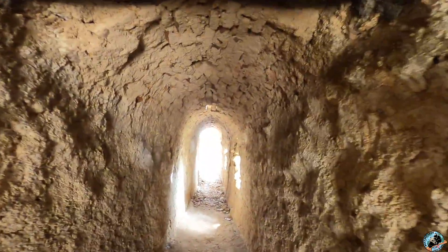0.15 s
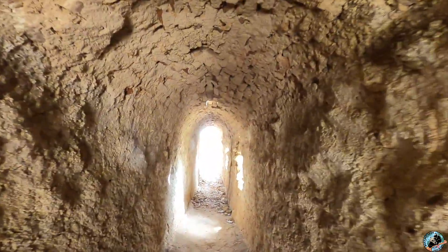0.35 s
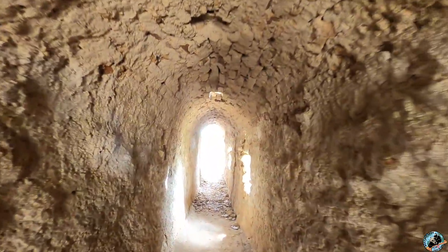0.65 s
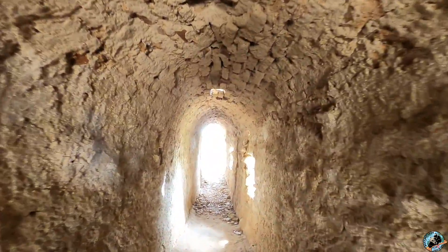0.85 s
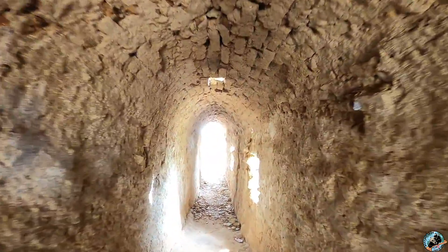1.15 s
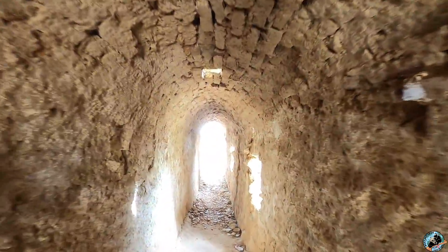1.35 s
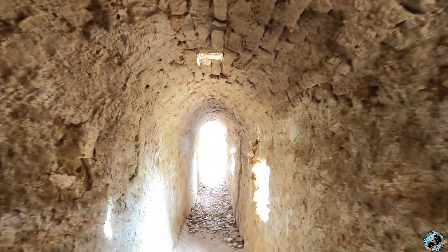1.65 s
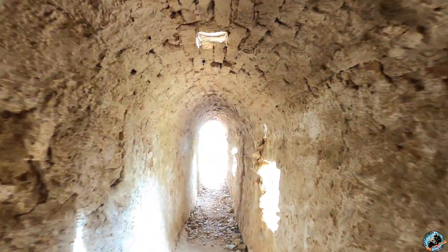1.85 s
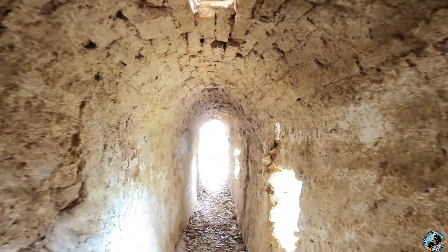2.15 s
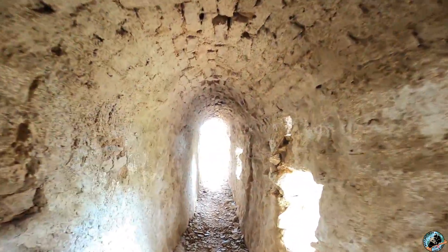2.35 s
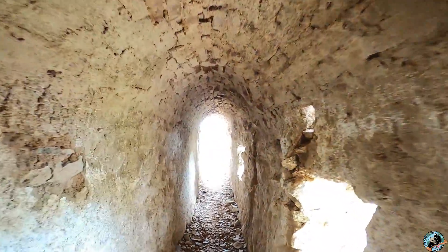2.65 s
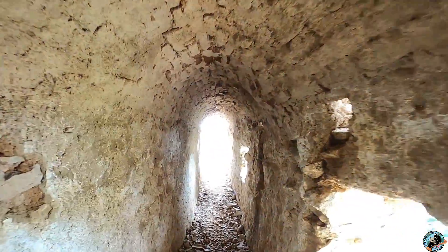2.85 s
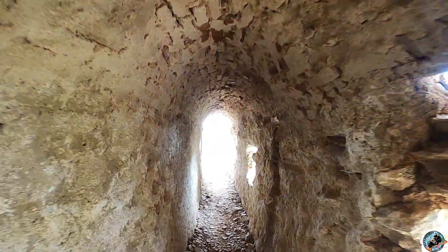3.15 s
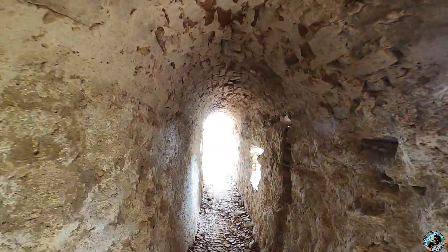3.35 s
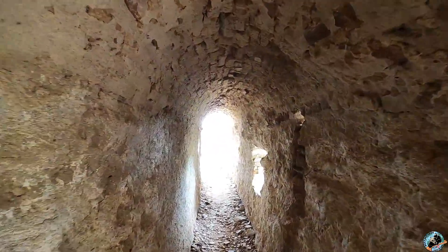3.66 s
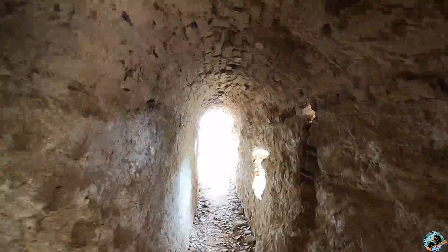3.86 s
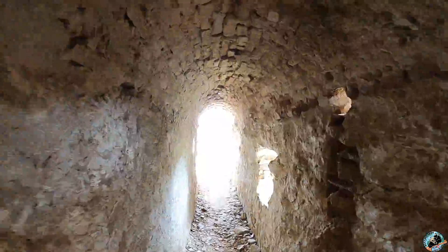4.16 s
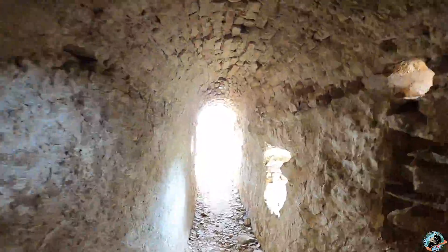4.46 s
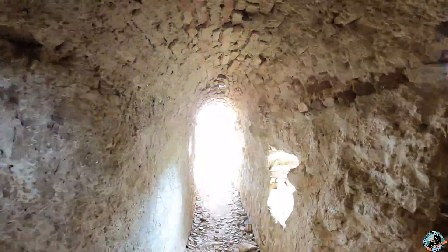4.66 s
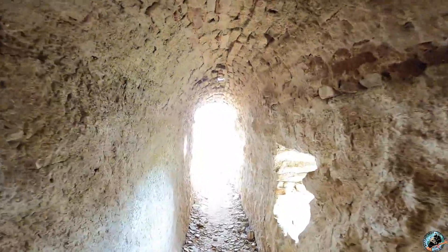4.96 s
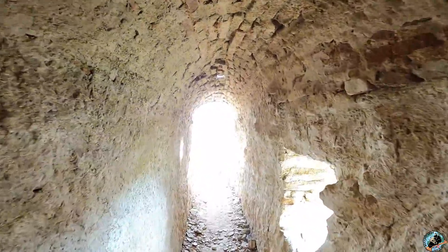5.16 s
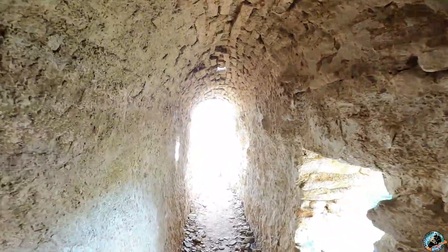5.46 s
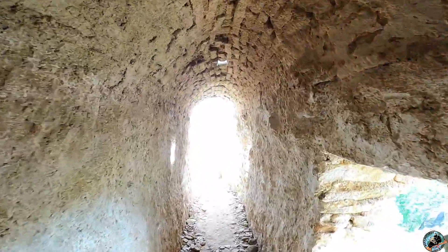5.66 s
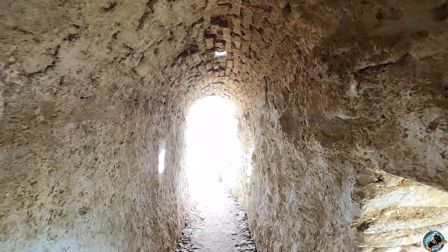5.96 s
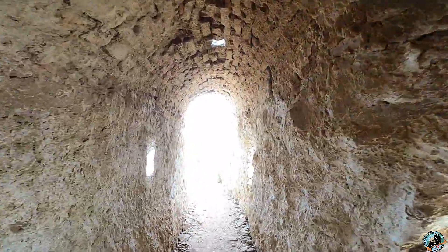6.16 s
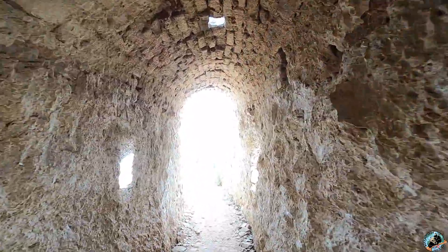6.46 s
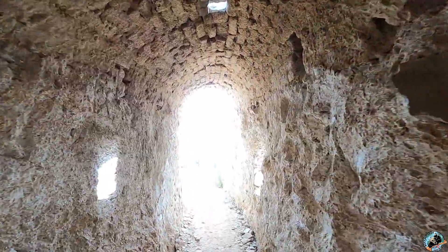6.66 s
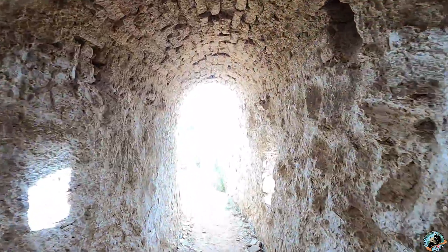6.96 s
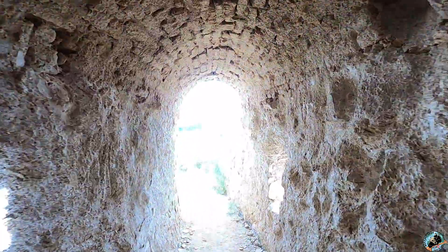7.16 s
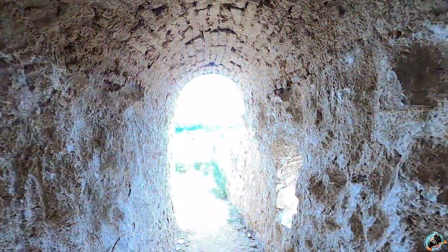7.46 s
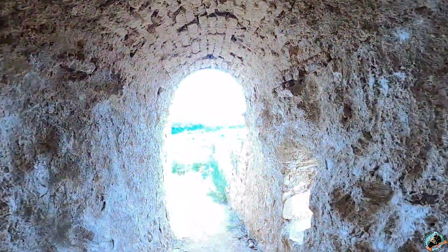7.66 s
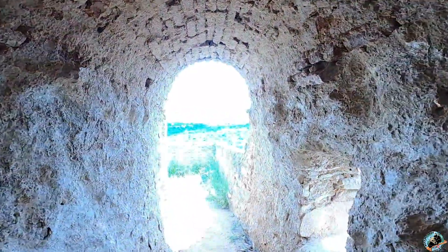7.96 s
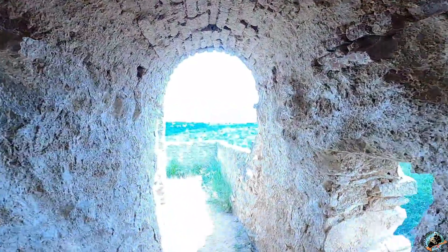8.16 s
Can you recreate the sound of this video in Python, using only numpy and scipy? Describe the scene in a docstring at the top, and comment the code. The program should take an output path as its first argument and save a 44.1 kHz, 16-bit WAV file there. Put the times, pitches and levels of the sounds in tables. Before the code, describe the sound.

Close stereo footsteps on loose stones, fourteen in about eight seconds, at a regular walking pace. Each differs: some roll softly with sandy scraping, others bite suddenly with snapping pebbles and a heavy knock. Rough masonry answers with very short, dark resonance rather than a long echo. Soft low wind puffs rumble against the microphone throughout, with a thin distant outdoor hiss. The heaviest crunches come after six seconds.

```python
"""Footsteps crunch over loose gravel in a narrow stone tunnel: each is crushed grit, snapping stones, a thump.
Grit is clumped noise and tiny damped rings; stones are noise cracks with short rings and a ground knock.
The cross modes of the vault boom after each step: three unsteady hums and a blur of filtered noise.
Moving air, as low lumpy noise, buffets two microphone ports; shaped noise gives the tunnel a faint hiss."""
import sys
import numpy as np
from scipy import signal
from scipy.fft import rfft, irfft, next_fast_len
from scipy.io import wavfile
from scipy.ndimage import map_coordinates

SR = 44100
rng = np.random.default_rng(int(sys.argv[2]) if len(sys.argv) > 2 else 0)


def boost(x):
    """Linear amplitude factor 10**(x/20) for a level x in decibels (scalar or array-like)."""
    u = np.asarray(x, float) / 20
    return 10 ** u


def wav_out(sig):
    """Save sig, one row per channel (or a flat mono array), as 16-bit PCM at SR to the path in sys.argv[1]."""
    wavfile.write(sys.argv[1], SR, np.round(np.clip(np.atleast_2d(sig).T, -1, 1) * 32767).astype(np.int16))


N = 366471

# Cross modes of the vault. Each row: centre in Hz, width in Hz, response in dB.
VAULT_MODES = [(86.5, 7.9, 2), (168.4, 37, 1), (250.6, 33, 3), (315, 57, 1.5), (389, 34.4, 2),
               (434.7, 66, 1.5), (570, 520, -9)]
# Spectrum of crushed grit. Each row: frequency in Hz, relative level in dB.
GRIT_SPECTRUM = [(290, -39), (500, -8.5), (569, -3.5), (781, -3), (1030, 4.5), (1180, 3.5), (1390, 5),
                 (1510, 5), (3850, -12), (4310, -15.5), (7560, -22), (8240, -30.5), (13000, -43),
                 (15500, -52)]
# Loose grit stirred by the swinging foot. Each row: time in seconds, level in dB.
STIRRED_GRIT = [(0, -45), (0.41, -53), (0.6, -45), (0.9, -49), (1.26, -41), (1.56, -47.5), (1.9, -42),
                (2.5, -49.5), (3.18, -45.5), (3.45, -54.5), (4.1, -44), (4.43, -51), (5.0, -48),
                (5.36, -65), (5.69, -42), (6.1, -59.5), (6.39, -55.5), (6.9, -54.5), (7.5, -58.5),
                (8.31, -57.5)]


def unit(x):
    """Scaled to rms 1."""
    return x / np.sqrt(np.mean(x ** 2) + 1e-20)


def along(points, hz):
    """(Hz, value) points interpolated on a log frequency axis."""
    f, v = np.transpose(points)
    return np.interp(np.log(hz + 1), np.log(f + 1), v)


def curves(rows):
    """One value per sample for each column after the time."""
    s, *cols = np.transpose(rows)
    return [np.interp(np.arange(N) / SR, s, c) for c in cols]


def wobble(knots_per_s):
    """Two smooth random curves through normally distributed knots."""
    knots = rng.standard_normal((2, int(N * 200 / SR)))
    position = np.arange(N) * knots_per_s / SR
    return np.array([map_coordinates(k, [position]) for k in knots])


def filtered(x, response):
    """x times a complex response of frequency."""
    m = next_fast_len(N + SR // 2)
    return irfft(rfft(x, m) * response(np.fft.rfftfreq(m, 1 / SR)), m)[..., :N]


def modes(table):
    """Causal response of a set of resonances, summed with alternating sign."""
    def response(f):
        total = 0
        for k, (centre_hz, width_hz, db) in enumerate(table):
            damping = 1j * f * width_hz
            total = total + (-1) ** k * boost(db) * damping / (centre_hz ** 2 - f * f + damping)
        return total
    return response


def treble(hz):
    """The share of each frequency that counts as brightness."""
    return 1 / (1 + (3300 / (hz + 1)) ** 6)


def swells(s, db, attack_s, hold_s, fade_db_per_s, grow_db_per_s=0):
    """Power-summed gain of events that rise before s, hold while growing, and fade."""
    t = np.arange(0, N, 32) / SR - np.c_[s]
    attack_s = np.abs(np.c_[attack_s]) + 1 / SR
    hold_s = np.abs(np.c_[hold_s])
    growth_db = grow_db_per_s * np.clip(t, 0, hold_s)
    fade_db = fade_db_per_s * np.maximum(t - hold_s, 0)
    rise = np.clip(1 + t / attack_s, 0, 1)
    gain = np.sqrt(np.sum((boost(np.c_[db] + growth_db - fade_db) * rise) ** 2, 0))
    return np.interp(np.arange(N), np.arange(0, N, 32), gain)


def pebbles(centre_hz, octaves, cycles, spread_db, count, size):
    """Two strands of tiny damped rings, each ring with its own pitch, life and strength."""
    when, pitch, life, luck, *shares = rng.random((count, 6)).T
    hz = np.clip(centre_hz * 2 ** (octaves * (2 * pitch - 1)), 400, 14000)[:, None]
    t = np.arange(size) / SR
    decay = np.exp(-t * hz / (cycles * (0.23 + life[:, None])))
    strength = np.sqrt(hz) * boost(-spread_db * np.log(luck + 0.012))[:, None]
    ring = np.sin(2 * np.pi * hz * t) * decay * strength
    at = ((when * N).astype(int)[:, None] + np.arange(size)).ravel()
    strands = [np.bincount(at, (ring * (2 * s - 1)[:, None]).ravel(), N + size)[:N] for s in shares]
    return unit(np.array(strands))


def walls(x):
    """Rough stone answers each strand with noise tails; three tails take turns, the lows lasting longest."""
    # Each row: frequency in Hz, t60 in seconds.
    wall_decay = [(300, 0.31), (1500, 0.061), (5000, 0.094), (12000, 0.082)]
    turn = np.pi * np.arange(N) / SR / 0.9  # one round of the three tails takes 0.9 s
    wet = 0
    for k in range(3):
        hz, t, z = signal.stft(rng.standard_normal((2, SR // 2)), SR, nperseg=256)
        decay = boost(-60 * t / along(wall_decay, hz)[:, None])
        tail = signal.istft(z * decay, SR, nperseg=256)[1]
        share = np.cos(turn + k * np.pi / 3) ** 2
        wet = wet + signal.fftconvolve(x * share, tail / np.linalg.norm(tail[0]), axes=1)[:, :N]
    return wet


def crunch():
    """Gains of dull and bright grit: a roll grows and dulls under the weight, a bite is over at once."""
    # A sole rolls over the grit. Each row: time in seconds, level in dB, hold in seconds, brightness in dB.
    roll_rows = [(0.044, -29.5, 0.16, -4.5), (0.335, -43.5, 0.0084, -23), (0.625, -35.5, 0.12, 0.5),
                 (0.74, -28, 0.041, -8), (1.304, -32, 0.069, -0.5), (1.414, -32, 0.07, -8),
                 (1.978, -36, 0.13, 1), (2.309, -28, 0.0042, -9), (2.5, -53, 0.0022, -7),
                 (2.601, -32, 0.16, -0.5), (3.199, -35.5, 0.13, 0.5), (3.537, -50, 0.012, -11),
                 (3.87, -36, 0.16, 1.5), (4.05, -49.5, 0.02, -6), (4.462, -40.5, 0.027, -2),
                 (4.527, -32, 0.04, -9.5), (5.063, -32.5, 0.07, -0.5), (5.174, -32.5, 0.034, -5.5),
                 (5.266, -44, 0.003, -25), (5.803, -39.5, 0.023, -8.5), (6.014, -51.5, 0.003, -24),
                 (6.413, -21.5, 0.0019, -9), (6.688, -60, 0.068, -7), (7.015, -46.5, 0.015, 2.5),
                 (7.113, -39, 0.003, -0.5), (7.23, -46, 0.079, -3.5), (7.71, -27.5, 0.0026, -13.5),
                 (8.227, -34.5, 0.052, -4)]
    # The grit gives way at once. Each row: time in seconds, level in dB, brightness in dB.
    bite_rows = [(0.614, -27.5, -0.7), (1.912, -47, -12), (2.642, -41, -4), (3.868, -24.5, -14.5),
                 (4.02, -34, -14), (4.475, -32, -1), (5.078, -37, -13), (5.732, -26, -15.5),
                 (5.854, -49, -18), (6.441, -39, -15), (6.577, -41, -25), (6.686, -35.5, -13),
                 (6.711, -45, -7), (7.05, -26.5, -10.5), (7.576, -36.5, -25), (7.644, -20.5, -11.5)]
    roll_attack_s, bite_attack_s = 0.015, 0.011
    grow_db_per_s, dull_db_per_s = 4.5, 61.5
    bite_fade_db_per_s = 525
    s, db, hold_s, bright_db = np.transpose(roll_rows)
    roll_fade_db_per_s = np.c_[221 + 301 * hold_s]  # the longer the roll, the more abruptly the foot lifts

    def roll(level_db, growth):
        return swells(s, level_db, roll_attack_s + 0 * s, hold_s, roll_fade_db_per_s, growth)

    at, bite_db, bite_bright_db = np.transpose(bite_rows)

    def bite(level_db):
        return swells(at, level_db, bite_attack_s + 0 * at, 0 * at, bite_fade_db_per_s)

    stir = boost(curves(STIRRED_GRIT)[0])
    dull = roll(db, grow_db_per_s) + bite(bite_db) + stir
    bright = roll(db + bright_db, grow_db_per_s - dull_db_per_s) + bite(bite_db + bite_bright_db)
    return dull, bright + boost(-8) * stir


def grit(clump_db, bed, coarse, wet):
    """Fine and coarse pebbles slip in clumps over a bed of sand (noise); the walls blur them."""
    dull_gain, bright_gain = crunch()
    fine = pebbles(centre_hz=2870, octaves=2.23, cycles=4.5, spread_db=-1.5, count=24000, size=128)
    # pitches are even per octave: tilt back to an even spectrum
    fine = unit(filtered(fine, lambda hz: np.sqrt(hz / 2500)))
    large = pebbles(centre_hz=2000, octaves=1.2, cycles=6.5, spread_db=2, count=2400, size=640)
    grains = fine + coarse * large + bed * rng.standard_normal((2, N))
    grains = boost(clump_db * (wobble(35)[0] + 0.87 * wobble(120)[0])) * grains
    dull = unit(filtered(grains, lambda hz: boost(along(GRIT_SPECTRUM, hz)) * (1 - treble(hz))))
    bright = unit(filtered(grains, lambda hz: boost(along(GRIT_SPECTRUM, hz)) * treble(hz)))
    dry = dull_gain * dull + bright_gain * bright
    # single grains that roll on, over the stirred grit
    stray = pebbles(centre_hz=2385, octaves=1.09, cycles=5.4, spread_db=5.0, count=500, size=512)
    stray = unit(filtered(stray, lambda hz: boost(along(GRIT_SPECTRUM, hz) / 2)))
    dry = dry + boost(curves(STIRRED_GRIT)[0] - 9) * stray
    return dry + wet * walls(dry)


def air():
    """Lumpy low noise in puffs, partly unrelated between the ports and stronger on the left."""
    # Each row: time in seconds, level in dB, hold in seconds, fade in dB per second.
    puff_rows = [(0.037, -33, 0.16, 71), (0.632, -37, 0.23, 83), (1.322, -35.5, 0.051, 92),
                 (1.524, -37.5, 0.016, 140), (1.825, -52, 0.05, 87), (1.992, -28, 0.22, 150),
                 (2.346, -34.5, 0.034, 86), (2.468, -28, 0.027, 90), (2.614, -28, 0.092, 73),
                 (2.82, -39, 0.02, 130), (3.04, -48, 0.043, 150), (3.255, -32, 0.18, 230),
                 (3.722, -42.5, 0.04, 230), (3.897, -34, 0.11, 158), (4.165, -48.5, 0.04, 80),
                 (4.47, -31, 0.18, 133), (4.894, -39.5, 0.1, 90), (5.076, -28, 0.15, 177),
                 (5.378, -30, 0.076, 200), (5.53, -28.5, 0.038, 154), (5.745, -32, 0.4, 78),
                 (6.073, -25, 0.15, 262), (6.406, -29, 0.18, 66), (6.77, -29.5, 0.053, 58),
                 (7.013, -27, 0.2, 93), (7.545, -33, 0.05, 96), (7.698, -31, 0.3, 175),
                 (8.112, -33, 0.046, 90), (8.227, -21.5, 0.017, 120)]
    # Each row: frequency in Hz, relative level in dB.
    gust_spectrum = [(12, -43), (22, 1.5), (45, -0.5), (70, -5.5), (140, -20.5), (300, -39), (600, -87)]
    attack_s, calm_db = 0.044, -69
    lumps = boost(3.5 * wobble(16)) * rng.standard_normal((2, N))
    shared, own = unit(filtered(lumps, lambda hz: boost(along(gust_spectrum, hz))))
    s, db, hold_s, fade_db_per_s = np.transpose(puff_rows)
    strength = swells(s, db, attack_s + 0 * s, hold_s, np.c_[fade_db_per_s]) + boost(calm_db)
    return strength * np.array([1.41 * shared + 0.5 * own, 0.82 * shared - 0.6 * own])


def hiss():
    """Far outdoor noise coloured by the tunnel, slowly swelling."""
    # Level changes as the walker passes the openings. Each row: time in seconds, level in dB.
    outdoor_level = [(0, -43.5), (0.9, -48.5), (1.6, -49), (2.4, -50.5), (3.0, -51), (3.7, -57.5),
                     (4.6, -50), (5.4, -51.5), (6.2, -53.5), (7.0, -57.5), (8.31, -52.5)]
    # Each row: frequency in Hz, relative level in dB.
    hiss_spectrum = [(59, -46), (100, 1), (240, 3.5), (330, 3), (420, 8.5), (520, -3), (668, -15),
                     (843, -22), (1020, -10), (1960, -17), (7410, -17.5), (9340, -28.5), (12300, -34.5),
                     (15500, -53)]
    noise = rng.standard_normal((2, N))
    coloured = unit(filtered(noise, lambda hz: boost(along(hiss_spectrum, hz))))
    level_db = curves(outdoor_level)[0] + 2.3 * wobble(2.996)[0]
    return boost(level_db) * coloured


def boom():
    """Each load sets three clear modes humming, each a little unsteady; the close upper modes blur."""
    # Weight put on the ground. Each row: start in seconds, level in dB,
    # pitch in octaves above the first mode, swell in seconds.
    load_rows = [(0.028, -21.5, 1.5, 0.011), (0.035, -23, 0.7, 0.035), (0.06, -21, 0.073, 0.081),
                 (0.16, -22.5, 0.03, 0.075), (0.606, -12, 1.11, 0.014), (0.7, -27.5, 2.2, 0.05),
                 (0.72, -33, 0.05, 0.04), (0.76, -23, 0.16, 0.1), (0.81, -27, 1.53, 0.014),
                 (1.28, -39, 1, 0.037), (1.4, -37, 0.057, 0.14), (1.952, -22, 0.36, 0.0097),
                 (2.3, -42, 2, 0.04), (2.31, -31.5, 0.64, 0.028), (2.59, -44, 2.3, 0.12),
                 (2.6, -34, 0.05, 0.027), (2.75, -31.5, 0.041, 0.057), (3.181, -25.5, 0.39, 0.019),
                 (3.262, -26, 0.05, 0.031), (3.265, -30.5, 1.9, 0.026), (3.528, -34.5, 2.9, 0.009),
                 (3.857, -33, 2.2, 0.0066), (3.87, -22.5, 0.085, 0.065), (3.97, -37, 0.97, 0.025),
                 (4.449, -22.5, 1.33, 0.0067), (4.455, -19, 0.046, 0.013), (4.54, -34, 0.05, 0.027),
                 (4.545, -33.5, 1.4, 0.018), (5.044, -20.5, 1.24, 0.0068), (5.05, -21.5, 0.057, 0.033),
                 (5.1, -27, 0.05, 0.062), (5.19, -29.5, 1.44, 0.025), (5.716, -18.5, 0.22, 0.033),
                 (5.715, -19, 1.55, 0.033), (5.77, -9.5, 3.9, 0.11), (5.81, -21, 0.076, 0.04),
                 (6.1, -51, 0.044, 0.067), (6.392, -19.5, 0.85, 0.038), (6.41, -10.5, 2.73, 0.026),
                 (6.415, -21.5, 0.054, 0.043), (6.5, -23, 0.05, 0.043), (6.57, -27.5, 1.2, 0.017),
                 (6.68, -33, 0.05, 0.022), (6.69, -37, 2.2, 0.0067), (6.74, -31, 1.22, 0.047),
                 (6.99, -20, 1.15, 0.07), (7.07, -14.5, 0.3, 0.073), (7.09, -22, 1.5, 0.029),
                 (7.12, -30, 1.1, 0.046), (7.18, -25, 0.046, 0.07), (7.3, -41.5, 2.2, 0.029),
                 (7.559, -33, 2.2, 0.02), (7.635, -8, 0.32, 0.043), (7.64, -21, 2.3, 0.012),
                 (7.69, -16.5, 0.72, 0.072), (7.694, -20, 1.76, 0.044), (7.921, -30, 0.96, 0.04),
                 (7.945, -42.5, 2.24, 0.0055), (8.209, -27, 1.35, 0.01), (8.205, -25, 0.48, 0.042)]
    # Fades in dB per second: three clear modes, then the blur.
    boom_fades = [143, 214, 185, 202]
    s, db, octaves, swell_s = np.transpose(load_rows)
    pitches_hz = [hz for hz, *_ in VAULT_MODES[:3]] + [400]
    off_pitch_db_per_octave = [15] * 3 + [17.5]  # a mode far from the load's pitch is stirred less
    gains = []
    for hz, slope, fade in zip(pitches_hz, off_pitch_db_per_octave, boom_fades):
        off_octaves = np.abs(np.log2(hz / VAULT_MODES[0][0]) - octaves)
        gains.append(swells(s + swell_s, db - slope * off_octaves, swell_s, 0 * s, fade))
    *clear, blurred = gains
    t = np.arange(N) / SR
    hum = 0
    for (hz, width_hz, _), gain in zip(VAULT_MODES, clear):
        drift, flutter = wobble(0.96 * width_hz)
        hum = hum + np.sqrt(2) * gain * boost(2.27 * flutter) * np.sin(2 * np.pi * hz * t + drift)
    lumps = rng.standard_normal((2, N)) * boost(5.25 * wobble(25)[0])
    band = lambda hz: 1 / (1 + (hz / 700) ** 4) / (1 + (250 / (hz + 1)) ** 4)
    blur = unit(filtered(lumps, lambda hz: modes(VAULT_MODES[3:])(hz) * band(hz)))
    blur_gain = boost(1.1) * blurred + boost(-8) * crunch()[0]  # the crunch feeds the blur as well
    return hum * np.array([[1], [0]]) + blur_gain * blur


def heels(push_s):
    """Each heel gives the ground one soft push that the vault takes up."""
    # Each row: time in seconds, thud level in dB.
    heel_rows = [(0.033, -16), (0.616, -38), (1.279, -38), (1.956, -22), (2.589, -29), (3.188, -19),
                 (3.859, -7.5), (4.447, -13), (5.049, -8), (5.719, -34), (6.401, -3.5), (6.995, -10.5),
                 (7.639, -13), (8.213, -30)]
    pushes = np.zeros(N + SR)
    u = np.arange(SR // 10) / SR / push_s
    for s, db in heel_rows:
        pushes[round(s * SR):][:len(u)] -= boost(db) * u * (2 - u) * np.exp(-u)
    return filtered(pushes[:N], lambda hz: 1 + 0.48 * modes(VAULT_MODES)(hz))


def stones(snap_t60, ring_t60, knock_t60, thump_s):
    """A stone gives a noise crack, dull and bright, and four short rings; its blow knocks the ground once."""
    # Each row: time in seconds, level in dB, ring in Hz, brightness in dB, knock level in dB.
    stone_rows = [(0.04, -8.5, 3340, 0.5, -16.5), (0.147, -4, 1430, -18, -23), (0.32, -25, 1180, -27, -29),
                  (0.514, -26, 2810, -5, -36), (0.612, -3.5, 3130, -22, -18), (0.731, -3, 955, -22, -23),
                  (0.824, -19.5, 1056, -2, -28.5), (1.187, -16, 1225, -22, -51),
                  (1.275, -11, 1280, -27, -55), (1.31, -13, 1060, -3, -31), (1.445, -7, 1010, -29, -30),
                  (1.765, -25, 1880, -21, -50), (1.91, -20, 2010, -23, -44), (1.961, -23, 2070, -4, -25),
                  (1.985, -7, 3060, -8, -33), (2.052, -8, 1410, -13, -23), (2.307, -8, 1430, -25, -33),
                  (2.63, -6, 1130, -30, -27), (2.719, -18, 1780, -3, -24), (3.188, -22, 1970, 7.5, -27),
                  (3.531, -9, 2030, -21, -31), (3.645, -21.5, 1510, -10, -48),
                  (3.727, -26.5, 2040, -3.5, -57), (3.815, -23, 2320, -25, -69),
                  (3.868, -5.5, 2255, -5, -16.5), (3.959, -9, 1240, -9, -30), (4.021, -3.5, 1166, -33, -34),
                  (4.076, -15, 1190, -18, -47), (4.103, -42, 3020, -7, -55), (4.513, -15, 1620, -13, -56),
                  (4.547, -12, 1460, -10, -35), (4.903, -24, 1080, -33, -53),
                  (4.969, -22.5, 1140, -7.5, -60), (5.03, -10.5, 1500, -15, -44),
                  (5.062, -3, 2810, -9, -33), (5.077, -7, 2870, -23, -27), (5.099, -12, 1480, -32, -35),
                  (5.121, -10, 1040, -23, -23), (5.264, -3.5, 3210, -9.5, -44),
                  (5.701, -15, 946, -7.5, -31), (5.722, -40, 1370, -31, -10),
                  (5.798, -12, 1370, -12, -22.5), (5.839, -7.5, 1344, -33, -16),
                  (6.026, -31.5, 1800, 1.5, -36.5), (6.401, -5.5, 1640, -9, -20),
                  (6.41, -6.5, 1580, -3, -12.5), (6.44, 3.5, 2856, -10, -5.5), (6.488, -16, 716, -7, -23.5),
                  (6.577, -6.5, 1350, -18, -29), (6.632, -31, 1490, 2, -37), (6.681, -8.5, 1530, -15, -26),
                  (6.71, -32, 930, 6.5, -14.5), (6.999, -18, 660, -35, -19.5), (7.01, -22, 750, -2, -24),
                  (7.04, -10, 1880, -5, -25), (7.058, -10.5, 1400, -5.5, -14), (7.103, -3.5, 905, -46, -15),
                  (7.219, -29, 1050, -20, -43), (7.312, -32, 1010, -20, -31), (7.39, -45, 910, -20, -31.5),
                  (7.569, -24, 960, -50, -28.5), (7.641, -17, 1800, -13, -7.5),
                  (7.673, -3.5, 1320, -15.5, -25), (7.704, 1.5, 1180, -43, -10),
                  (8.219, -32, 2400, -32, -40), (8.243, -11, 1250, -7, -24), (8.282, -8.5, 1134, -28, -27)]
    # Knock pitch changes from blow to blow. Each row: time in seconds, knock in Hz.
    knock_pitch = [(0, 320), (0.55, 345), (0.6, 243), (0.85, 250), (1.2, 407), (3.6, 425), (3.9, 318),
                   (4.5, 270), (5.9, 259.5), (6.41, 315), (6.44, 467), (6.5, 227), (7.25, 224), (7.31, 330),
                   (7.4, 327), (7.55, 228), (8.31, 228)]
    low, high, blows = np.zeros((2, N + SR)), np.zeros((2, N + SR)), np.zeros(N + SR)
    t = np.arange(SR // 8) / SR
    for s, db, ring_hz, bright_db, knock_db in stone_rows:
        start = round(s * SR)
        knock_hz = np.interp(s, *np.transpose(knock_pitch))
        noise, ratios = rng.standard_normal((3, len(t))), rng.uniform(0.5, 3.3, 3)
        click = 0.3 * np.sign(noise[:2]) * boost(-60 * t / 0.00094)
        crack = click + 0.5 * noise[:2] * boost(-60 * t / snap_t60)
        crack = crack * [[1], [0.5]]  # a single stone reaches both ports more alike than a spray
        rough = 0.16 * np.cumsum(noise[2])
        ring = lambda hz: np.sin(2 * np.pi * hz * t + rough) * boost(-60 * t / ring_t60)
        body = 0.24 * ring(ring_hz) + 0.032 * sum(ring(ring_hz * r) for r in ratios)
        # a big stone cracks low, a small one high
        sized = signal.lfilter(*signal.iirpeak(ring_hz, 1, SR), crack)
        knock = 0.57 * np.sin(2 * np.pi * knock_hz * t) * boost(-60 * t / knock_t60)
        push = 1.92 * (1 - t / thump_s) * np.exp(-t / thump_s)
        low[:, start:][:, :len(t)] += boost(db) * (0.89 * sized + body * [[1], [0.6]])
        high[:, start:][:, :len(t)] += boost(db + bright_db) * 1.98 * crack
        blows[start:][:len(t)] += boost(knock_db) * (knock + push)

    def dull_response(hz):
        return boost(0.043 * along(GRIT_SPECTRUM, hz)) * (1 - treble(hz)) / (1 + (750 / (hz + 1)) ** 4)

    def bright_response(hz):
        tilt_db = 1.17 * (along(GRIT_SPECTRUM, hz) - along(GRIT_SPECTRUM, 4050))
        return boost(tilt_db) / (1 + (hz / 8000) ** 6) * treble(hz)

    snaps = filtered(low[:, :N], dull_response) + filtered(high[:, :N], bright_response)
    thump = filtered(blows[:N], lambda hz: 0.26 + 1.54 * modes(VAULT_MODES)(hz))
    return snaps, thump


def high_rings():
    """Brief high notes, each a decaying sine of slightly rough phase; one is faint and thin near 7.8 kHz."""
    # Each row: time in seconds, level in dB, ring in Hz, t60 in seconds.
    ring_rows = [(5.066, -10.5, 6850, 0.0093), (5.077, -21, 7240, 0.024), (5.264, -34, 7770, 0.075),
                 (6.604, -43.5, 5670, 0.029), (6.683, -27, 4260, 0.047), (6.708, -25, 3970, 0.026),
                 (6.75, -49, 8500, 0.029)]
    rings = np.zeros(N + SR)
    t = np.arange(SR // 6) / SR
    onset = 1 - np.exp(-t / 0.00042)
    for s, db, hz, t60 in ring_rows:
        rough = 0.049 * np.cumsum(rng.standard_normal(len(t)))
        tone = np.sin(2 * np.pi * hz * t + rough)
        rings[round(s * SR):][:len(t)] += boost(db - 60 * t / t60) * tone * onset
    return rings[:N]


def ports(pair):
    """Two strands become mid and side, then left and right with likeness, lean and lead set by frequency."""
    # Each row: frequency in Hz, left-right likeness from -1 to 1.
    likeness = [(60, 0.41), (150, -0.0057), (380, 0.93), (950, 0.64), (2380, 0.69), (5980, 0.067),
                (15000, 0.25)]
    # Each row: frequency in Hz, left over right in dB.
    left_lean = [(60, 0), (150, 0), (380, 0.5), (950, 2.5), (2380, 5), (5980, 2), (15000, -1)]
    # Each row: frequency in Hz, radians by which left leads.
    left_lead = [(0, 0), (520, 0.0), (2070, -0.6), (3190, -0.8), (6030, 1.2), (6800, 1.7), (7920, 1.1),
                 (8530, 3.2), (8790, 3.0), (13500, 3.2), (15000, 2.8), (15200, 5.2)]
    turn = lambda hz: np.arccos(np.clip(along(likeness, hz), -1, 1)) / 2
    mid, side = filtered(pair, lambda hz: np.array([np.cos(turn(hz)), np.sin(turn(hz))]))
    half = lambda hz: boost(along(left_lean, hz) / 2) * np.exp(0.5j * along(left_lead, hz))
    return filtered(np.array([mid + side, mid - side]), lambda hz: np.array([half(hz), 1 / half(hz)]))


def scene():
    """Steps, their echo and the hiss reach the ports; the air acts on them directly."""
    snaps, thump = stones(snap_t60=0.038, ring_t60=0.056, knock_t60=0.084, thump_s=0.0026)
    snaps = snaps + high_rings()
    snaps = snaps + boost(-6) * walls(snaps)
    ground = (thump + heels(push_s=0.0015)) * np.array([[1], [0]])  # mid only
    crushed = grit(clump_db=1.5, bed=1.0, coarse=0.24, wet=0.43)
    steps = snaps + crushed + ground + boom()
    return ports(steps + hiss()) + air()


def top_cut(x):
    """Nothing passes above the cut-off."""
    return signal.sosfilt(signal.butter(12, 15700, fs=SR, output="sos"), x)


def record(dry):
    """Peaks beyond full scale are clipped."""
    mix = np.clip(dry, -1, 1)
    return top_cut(mix)


dry = scene()
out = record(dry)
wav_out(out)
```